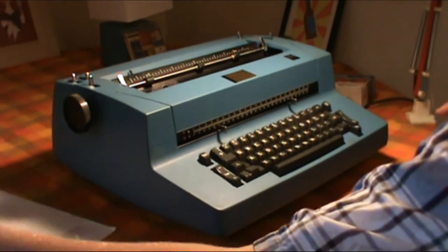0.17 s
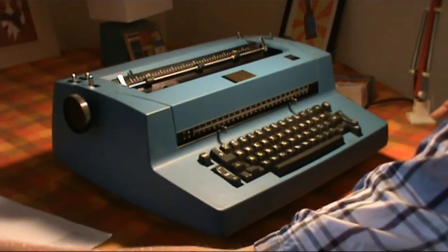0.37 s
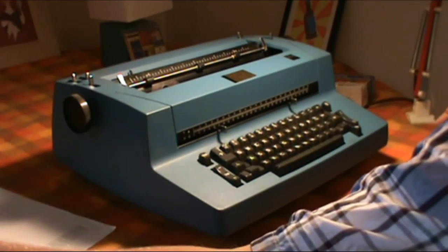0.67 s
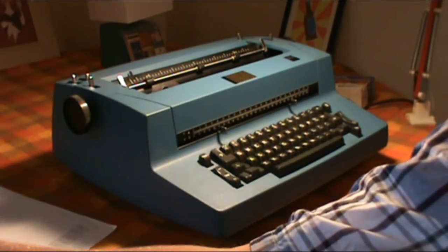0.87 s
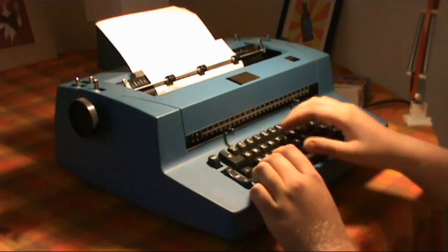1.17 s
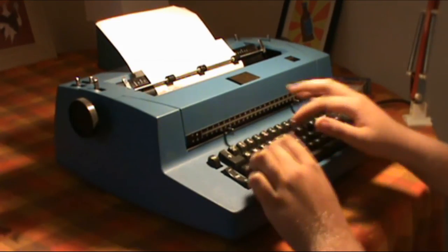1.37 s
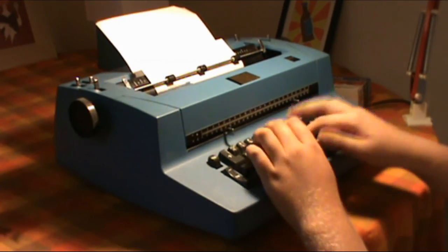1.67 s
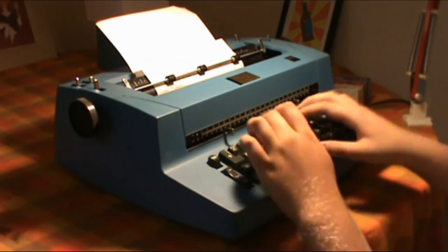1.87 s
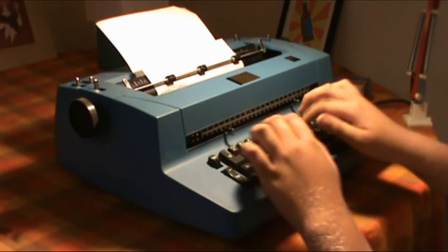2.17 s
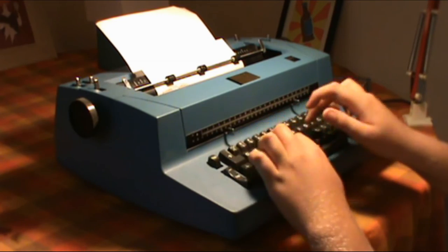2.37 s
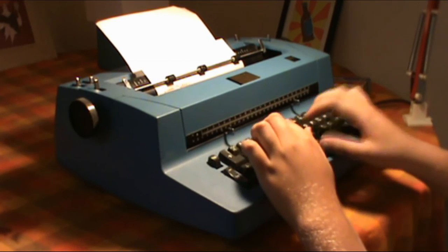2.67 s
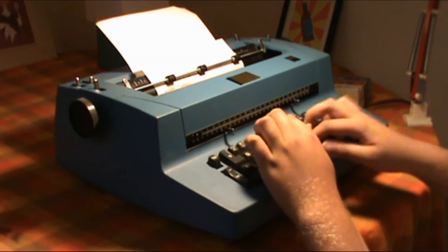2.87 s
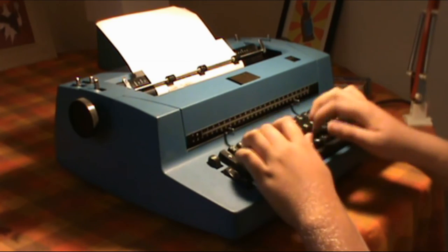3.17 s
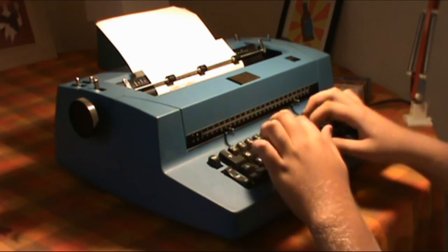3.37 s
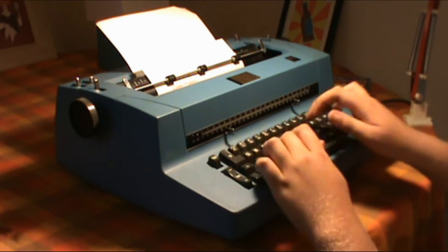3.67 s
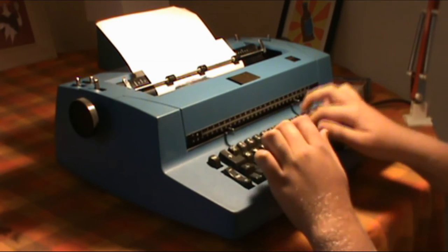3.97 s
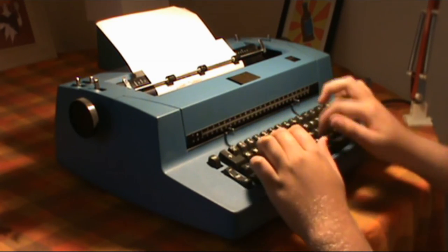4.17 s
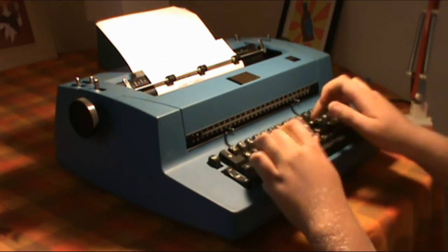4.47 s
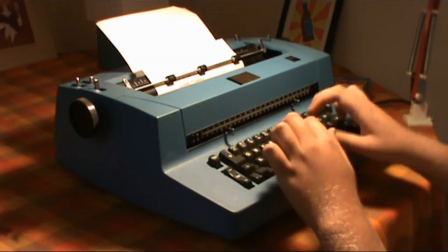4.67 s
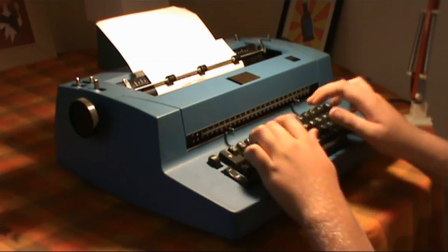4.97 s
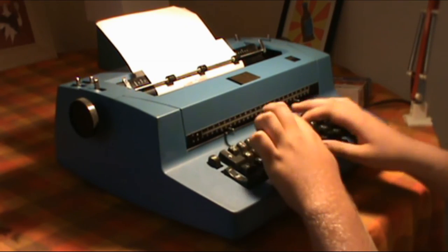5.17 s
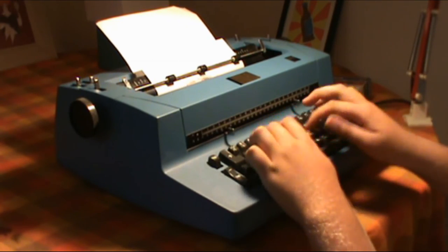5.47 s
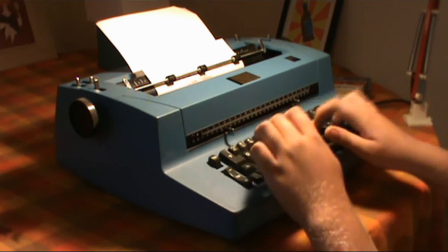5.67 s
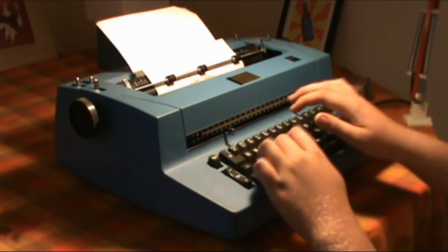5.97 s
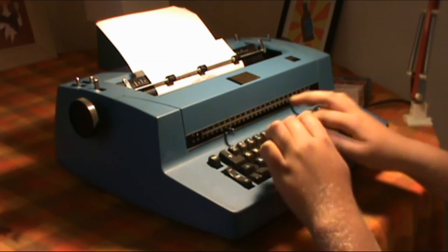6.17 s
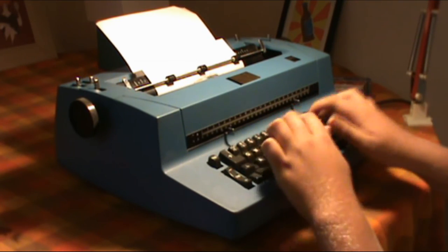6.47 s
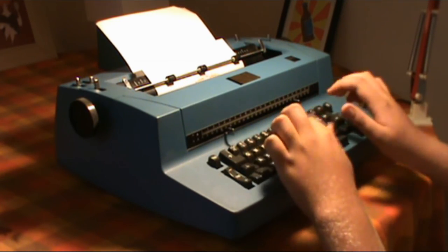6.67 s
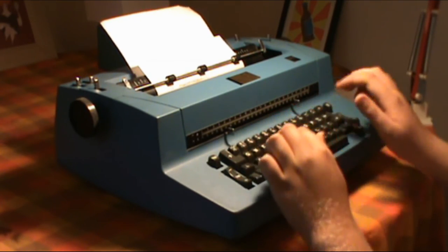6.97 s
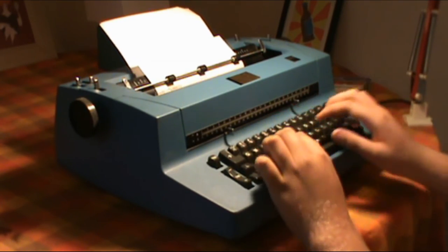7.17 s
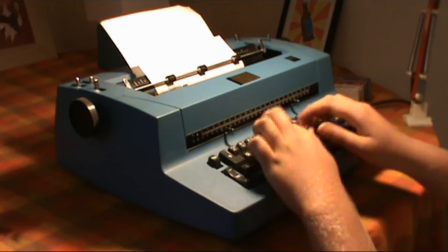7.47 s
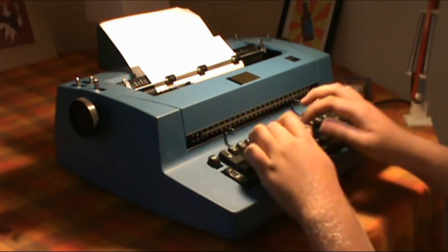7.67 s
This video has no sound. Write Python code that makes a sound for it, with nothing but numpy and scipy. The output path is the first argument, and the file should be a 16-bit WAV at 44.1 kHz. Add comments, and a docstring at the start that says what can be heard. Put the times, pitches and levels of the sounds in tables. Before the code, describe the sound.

Quiet motor hum and soft paper swish, then a sudden cut to busy electric typing: sharp key snaps, clacking print strikes, buzzing mechanical drive, late carriage return.

```python
"""An electric ball typewriter in a small room first idles, with a 120 Hz hum and a faint pulley tick, while
a sheet of paper is slid aside: sines, struck sines and filtered noise. Abruptly it is in full use: the drive
knocks about 70 times a second, keys snap, and bursts of impacts make each print cycle clack and clatter while
resonances boom as the case. Near the end the carriage runs back to the margin, and a few more print cycles
follow. Soft room air, filtered noise, lies under it all."""
import sys
import numpy as np
from scipy import signal
from scipy.fft import rfft, irfft
from scipy.io import wavfile
from scipy.ndimage import uniform_filter1d

SR = 44100
rng = np.random.default_rng(int(sys.argv[2]) if len(sys.argv) > 2 else 0)


def put_to_file(sound):
    """Save the sound as 16-bit audio at rate SR, in the file named by the first command-line argument."""
    columns = np.atleast_2d(sound).T  # one column per channel
    safe = np.clip(columns, -1, 1)
    whole_steps = np.round(safe * 32767)
    wavfile.write(sys.argv[1], SR, whole_steps.astype(np.int16))


N = 344862
T = np.arange(N) / SR  # time of every sample, s
IDLE_END = 1.074  # s
KNOCK_HZ = 70.5  # steady turns of the drive per second, one knock each

# Levels and strengths in the event tables are relative: each layer adds its own trim.
# Print cycles. Each row: nominal time in seconds, clatter level in dB, case boom level in dB.
PRINT_CYCLES = [(1.327, -20, -26.5), (1.439, -23.5, -29.5), (1.713, -18, -32), (1.822, -17.5, -30.5),
                (2.078, -16, -25.5), (2.17, -18, -31), (2.319, -18.5, -21), (2.438, -18.5, -38),
                (2.53, -19, -32), (2.942, -19, -24), (3.026, -20, -37), (3.136, -20.5, -24),
                (3.229, -18.5, -31), (3.3, -20, -25.5), (3.545, -18.5, -32), (3.624, -18.5, -43),
                (3.728, -19.5, -32), (3.823, -25, -34), (3.991, -19.5, -29), (4.127, -19.5, -26),
                (4.29, -20.5, -47.5), (4.454, -19, -30.5), (4.572, -18.5, -30), (4.715, -28, -52),
                (4.814, -18.5, -33), (4.895, -21.5, -27), (5.043, -18, -48), (5.14, -20, -28),
                (5.343, -18.5, -26), (5.413, -21, -38), (5.517, -17.5, -32.5), (5.595, -25.5, -63),
                (5.764, -20.5, -34), (5.854, -20.5, -28), (6.046, -17.5, -26), (6.154, -19, -40),
                (6.277, -27, -44), (6.407, -19, -29), (6.505, -18.5, -27), (6.619, -20.5, -24.5),
                (7.509, -18.5, -34), (7.618, -18.5, -30), (7.701, -19.5, -37)]
# Key and latch snaps. Each row: start in seconds, strength in dB, ring of the latch in Hz.
KEY_SNAPS = [(1.239, 2, 8000), (1.6286, 6.5, 8460), (1.9468, 7, 12300), (2.7908, 8.5, 12600),
             (2.8538, 4.5, 8380), (3.459, 9, 11500), (3.868, 9, 12600), (3.909, 5, 8530), (4.2148, 6, 5900),
             (4.4785, 5, 8140), (4.67, 6.5, 12000), (4.886, 2, 11000), (5.2506, 8.5, 10900),
             (5.3312, 1, 9400), (5.6347, 10, 11940), (5.765, 8, 9470), (5.967, 5, 9400), (6.3127, 8, 11900),
             (6.7667, 6, 8900), (6.773, 6.5, 6200), (7.423, 2, 8600)]
# Hard blows of the ball and its links. Each row: start in seconds, strength in dB.
HARD_BLOWS = [(1.287, 2), (1.682, 6.5), (1.904, 8.5), (3.4006, 7), (4.1114, 6.5), (4.779, 6.5), (5.309, 8),
              (5.682, 5.5), (5.7395, 4), (5.834, 9), (6.0239, 8.5), (6.2557, 7), (7.129, 7), (7.422, 8.5)]
# Heavy blows through the frame, the last as the carriage meets the margin. Each row: start in seconds, strength in dB.
FRAME_THUMPS = [(3.516, 3.5), (4.875, 8), (7.142, 5.5)]
# Loudness of the drive's knocking. Each row: time in seconds, level in dB.
KNOCK_LOUDNESS = [(1.1, -25.5), (1.6, -28), (2.12, -26), (2.86, -25), (2.95, -22.5), (3.58, -23),
                  (3.8, -27), (4.3, -23), (4.75, -27), (5.18, -23), (5.27, -30.5), (5.94, -51),
                  (6.07, -28.5), (6.68, -21), (6.88, -44), (6.93, -21.5), (7.09, -21), (7.22, -27),
                  (7.8, -22.5)]
# The belt-driven shaft gains and loses as the load changes. Each row: time in seconds, lead in turns.
SHAFT_LEAD = [(1.07, -.05), (1.5, .1), (1.63, .35), (2.1, .35), (2.55, .05), (2.9, .48), (3.25, .02),
              (3.65, -.15), (4.15, -.02), (4.55, -.23), (4.75, -.02), (5.2, -.22), (6, .02), (6.65, -.08),
              (6.9, .14), (7.17, -.26), (7.42, .3), (7.8, .08)]
# The drive takes up slack with one much harder knock. Each entry: time in seconds.
SLACK_JOLTS = [1.078, 1.093, 1.162, 1.177, 1.43, 1.596, 2.008, 2.832, 4.254, 4.637, 6.919, 7.262, 7.316]
# The carriage runs back to the margin. One row: start in seconds, end in seconds.
CARRIAGE_RUN = (6.945, 7.13)
# Print cycles that set the steel rail ringing. Each row: time in seconds, level in dB.
RAIL_STRIKES = [(3.235, -27), (4.285, -31), (4.81, -25), (5.395, -25), (6.1, -26), (7.57, -27.5)]
# Modes of the rail. Each entry: frequency in Hz.
RAIL_MODES = [3030, 3200, 3390]
# Turns on which the idling pulley catches on its higher note. Each entry: time in seconds.
PULLEY_CATCHES = [.104, .27, .337, .637]
# The sliding sheet. Each row: time in seconds, level in dB.
PAPER_SLIDE = [(0, -62), (.09, -57), (.18, -49.5), (.36, -66), (.55, -62), (.8, -68)]
# Relative spectra of knock, clatter, snap, paper and air. Each row: frequency in Hz, density in dB per Hz.
KNOCK_COLOUR = [(300, -8.5), (600, -15), (1250, -3), (1620, -1), (2000, 1), (2600, -11), (4400, -10.5),
                (5800, -13), (7500, -36), (9300, -11), (16000, -51)]
CLATTER_COLOUR = [(100, -1.5), (283, -3.5), (370, -7), (460, -4.5), (800, -8), (2000, -3.5), (3100, -6.5),
                  (5000, -6), (7300, -9.5), (9200, -7.5), (14400, -14.5), (16000, -21.5)]
SNAP_COLOUR = [(1500, -4), (3200, 1.5), (7200, -2.5), (9200, 4), (13000, -8), (16000, -13)]
PAPER_COLOUR = [(180, -30), (400, -6.5), (1700, -4), (5000, -4.5), (16000, -22)]
AIR_COLOUR = [(20, 1), (68, 6), (120, -1), (370, -5.5), (1500, -10), (16000, -14)]
# Resonances of case and table. Each row: frequency in Hz, width in Hz, relative level in dB.
CASE_MODES = [(77.4, 6.4, -20), (132.3, 10.6, -5.5), (203, 16, -13), (237.3, 9.8, -10), (280, 11.3, 4),
              (502.3, 15, -5.5), (537, 11, -5.5), (736, 18.5, -4)]
# Resonances of the metal frame. Each row: frequency in Hz, width in Hz, lift in dB.
FRAME_MODES = [(953, 40, 4.5), (1794, 28, 2.5), (1980, 40, 4), (3190, 290, 2.5), (5770, 190, 3)]
# Ring of machine and room. Each row: frequency in Hz, time to fall 60 dB in seconds.
RING_TIMES = [(200, 0.41), (1000, 0.37), (3000, 0.27), (8000, 0.17), (15000, 0.12)]
# Stereo width. Each row: frequency in Hz, side against mid in dB.
STEREO_WIDTH = [(60, -43), (250, -7.5), (500, -8), (2000, -8), (8000, -6.5), (12000, -7.5), (16000, -37)]


def strokes(mid_db=-3, bright_db=-6, body_db=-7.0, rise_s=0.028, fall_s=0.018, lead_s=0.0057, count=5):
    """Each print cycle is a burst of impacts: the ball tilts, turns, hits the platen and falls back."""
    rows, out = np.array(PRINT_CYCLES), np.zeros((2, N))
    for k in range(count):  # deal the cycles out to different links, each with its own ring
        s, db, _ = rows[k::count].T
        # root 2 turns the rise and fall of the amplitude into those of the power
        power = swells(s - lead_s, db, rise_s / np.sqrt(2), fall_s / np.sqrt(2))
        impacts = np.sqrt(power) * grains(per_s=380, spread_db=2.0)
        out += amp(mid_db) * strike(impacts, CLATTER_COLOUR, wet_db=5, lo_hz=1630, hi_hz=6200)
        out += amp(bright_db) * strike(impacts, CLATTER_COLOUR, wet_db=3.5, lo_hz=8300)
        out += amp(body_db) * strike(impacts, CLATTER_COLOUR, wet_db=-1, lo_hz=250, hi_hz=1600)
    return out


def clacks(settle_s=0.0043, thump_s=0.0094):
    """The ball hits the platen or a link its stop: a sudden hard clack, or a duller thump, through the frame."""
    out = np.zeros((2, N))
    for s, db in HARD_BLOWS:
        add(out, s, amp(db) * strike(blow(settle_s), CLATTER_COLOUR, wet_db=2, lo_hz=800, hi_hz=6700))
    for s, db in FRAME_THUMPS:
        add(out, s, amp(db) * strike(blow(thump_s), CLATTER_COLOUR, wet_db=1, lo_hz=480, hi_hz=1520))
    return out


def keys(snap_s=0.0085, lift_db=9, lift_width_hz=2800, ring_db=-8, ring_cycles=1100, spread=0.021, count=6):
    """A key trips its latch with a bright snap, and the latch rings on a few close modes of its own."""
    out, hz = np.zeros((2, N)), np.geomspace(200, 16000, num=120)
    for s, db, ring_hz in KEY_SNAPS:
        push = blow(snap_s)
        lift = lift_db / (1 + (2 * (hz - ring_hz) / lift_width_hz) ** 2)
        colour = read(SNAP_COLOUR, hz) + lift
        snap = strike(push, np.transpose([hz, colour]), wet_db=0, lo_hz=180)
        t = T[:len(push)]
        modes_hz = ring_hz * (1 + spread * rng.standard_normal(count))
        ring = sum(np.sin(2 * np.pi * f * t) for f in modes_hz)
        ring = ring * amp(-60 * t * ring_hz / ring_cycles)  # falls 60 dB in ring_cycles cycles
        snap[0] += amp(ring_db) * ring / np.linalg.norm(ring)
        add(out, s, amp(db) * snap)
    return out


def drive(level_db=-6, ring_db=-5, knock_hz=2010, knock_s=0.00054, chatter_db=-3.5, jolt_db=3, count=3):
    """Knocks swing a stiff bracket, even under load and ragged when slack; the frame rings, loose parts chatter."""
    times = knock_times()
    size, late, seat = rng.standard_normal((len(times), 3)).T
    slack = np.clip((-19 - np.interp(times, *np.transpose(KNOCK_LOUDNESS))) / 7, .2, 1)  # quieter is slacker
    times = times + .0005 * slack * late
    size = amp(4 * slack * np.minimum(size, .9))
    level = knock_level()
    scale = level / np.sqrt(np.sum(size ** 2) / N)
    seat, t = np.argsort(seat) % count, T[:SR // 100]
    chatter = level * grains(per_s=500, spread_db=2)
    out = amp(chatter_db) * strike(chatter, KNOCK_COLOUR, wet_db=-21.5, lo_hz=397)
    for k in range(count):  # the bracket seats in different ways, each with its own pitch and ring
        knocks = scale * clicks(times, size * (seat == k))
        jolts = amp(jolt_db) * clicks(SLACK_JOLTS[k::count], 0.96)
        hz = knock_hz * 1.02 ** (k - count / 2 + .5)
        swing = t * np.exp(-t / knock_s) * np.sin(2 * np.pi * hz * t)
        swing /= np.linalg.norm(swing)
        out[0] += signal.oaconvolve(amp(level_db) * knocks + jolts, swing)[:N]
        out += strike(amp(ring_db) * knocks + jolts / 2, KNOCK_COLOUR, wet_db=6, lo_hz=380)
    return out


def rattle(level_db=-5.5, count=2):
    """Springs and links shake all the while the machine is in use: scattered impacts through the frame."""
    level = amp(level_db) * rattle_level() / np.sqrt(count)
    out = np.zeros((2, N))
    for _ in range(count):
        impacts = level * grains(per_s=330, spread_db=4.0)
        out += strike(impacts, CLATTER_COLOUR, wet_db=4.5, lo_hz=232)
    return out


def rail(rise_s=.018, fall_s=0.028, return_db=-33, width_hz=190):
    """The steel rail rings under some print cycles and rattles while the carriage runs back along it."""
    power = swells(*np.transpose(RAIL_STRIKES), rise_s, fall_s) + carriage(return_db)
    impacts = np.sqrt(power) * grains(per_s=500, spread_db=6.5)
    ring = evened(sum(resonate(impacts, hz, width_hz) for hz in RAIL_MODES)) * impacts.std()
    return np.array([ring, np.zeros(N)])


def case(level_db=-6.0, shake=1.87, steady_db=-34, side_db=-12, thud_db=-22):
    """Knocks and random jolts keep the hollow case droning; its lowest modes follow the load only partly."""
    push = evened(clicks(knock_times(), 1))
    load_db = case_load() + level_db
    low = amp(steady_db + 0.51 * (load_db - steady_db))
    out = low * amp(thud_db) * noise([(20, -6), (55, 3), (100, 5), (200, -28), (500, -43)])
    for hz, width, db in CASE_MODES:
        mode = resonate(push - push.mean() + shake * rng.standard_normal(N), hz, width)
        mode /= np.sqrt(abs(uniform_filter1d(mode ** 2, size=6000)) + 1e-4)  # hold the drone steady
        side = amp(side_db) * resonate(rng.standard_normal(N), hz, width) + 0.067 * mode
        level = amp(load_db) if hz > 215 else low
        out += amp(db) * np.array([mode, side]) * level
    return out * (T > IDLE_END)


def idle(tick_db=-66, tick_hz=1902, catch_hz=2400, tick_t60=0.092,
         tap_db=-70, hum_db=-67, hum_hz=120, murmur_db=-69):
    """The motor hums and murmurs; its pulley ticks once a turn and now and then catches on a higher note."""
    times = np.arange(.0035, IDLE_END, 1 / 29.99)  # about 30 turns a second
    size = amp(2 * rng.standard_normal(len(times)))
    catch_turns = np.searchsorted(times, np.array(PULLEY_CATCHES) - .01)
    catches = np.isin(np.arange(len(times)), catch_turns)
    t, ring = T[:SR // 8], 0
    for hz, chosen in (tick_hz, ~catches), (catch_hz, 0.83 * catches):
        note = np.sin(2 * np.pi * hz * t) * amp(-60 * t / tick_t60)
        ring += signal.oaconvolve(clicks(times, size * chosen), note)[:N]
    tap_colour = [(1000, -6), (2500, -4), (3200, -17), (3850, -3), (5000, -21)]
    taps = strike(clicks(times, size), tap_colour, wet_db=-18)
    share = np.sqrt(IDLE_END * SR / N)  # keeps tick and tap levels true over the idle alone
    body = share * amp(tick_db) * evened(ring)
    body += amp(hum_db) * evened(np.sin(2 * np.pi * hum_hz * T))
    body += amp(murmur_db) * resonate(rng.standard_normal(N), hz=148, width=90)
    return (body * [[1], [.15]] + share * amp(tap_db) * evened(taps)) * (T < IDLE_END)


def paper():
    """A sheet slides over the table: friction as coloured noise that swells and fades with the motion."""
    return noise(PAPER_COLOUR) * amp(follow(PAPER_SLIDE)) * (T < IDLE_END)


def air(level_db=-63):
    """The quiet of the room: steady, low-weighted noise."""
    return amp(level_db) * noise(AIR_COLOUR)


def knock_times():
    """One knock for every turn of the drive, as its shaft gains and loses."""
    turns = KNOCK_HZ * T + follow(SHAFT_LEAD)
    return T[np.flatnonzero(np.diff(np.floor(turns)))]


def knock_level():
    """How hard the drive knocks, as a gain."""
    return amp(follow(KNOCK_LOUDNESS)) * (T > IDLE_END)


def rattle_level(loose_db=1.5, stroke_db=0.7, rise_s=0.069, fall_s=0.058,
                 key_db=-23, key_rise_s=0.00071, key_fall_s=0.095, return_db=-37):
    """The links shake with the knocks, around each print cycle, after each key and in the carriage return."""
    s, db, _ = np.transpose(PRINT_CYCLES)
    power = amp(follow(KNOCK_LOUDNESS) + loose_db) ** 2
    power += swells(s, db + stroke_db, rise_s, fall_s)
    power += swells(np.transpose(KEY_SNAPS)[0], key_db, key_rise_s, key_fall_s)
    power += carriage(return_db)
    return np.sqrt(power) * (T > IDLE_END)


def case_load(knock_db=-15, boom_db=-2.5, lag_s=0.0053, rise_s=0.025, fall_s=0.057, return_db=-29):
    """Shaking of the case in dB: lightly by the knocks, heavily by print cycles and the carriage return."""
    s, _, db = np.transpose(PRINT_CYCLES)
    power = amp(follow(KNOCK_LOUDNESS) + knock_db) ** 2
    power += swells(s + lag_s, db + boom_db, rise_s, fall_s)
    power += carriage(return_db)
    return 10 * np.log10(power)


def carriage(db, start_s=0.02, stop_s=0.021):
    """Power of the carriage return: the clutch takes hold, pulls evenly and lets go."""
    start, end = CARRIAGE_RUN
    return swells([start], db, start_s, stop_s, hold_s=end - start)


def swells(times, db, rise_s, fall_s, hold_s=0):
    """Power of a motion that builds up to each time, may hold, and dies away."""
    power = np.zeros(N)
    for s, level in zip(times, amp(db) * np.ones(len(times))):
        near = slice(max(int((s - 4 * rise_s) * SR), 0), int((s + hold_s + 4 * fall_s) * SR))
        t = T[near] - s
        rise = (np.minimum(t, 0) / rise_s) ** 2
        fall = (np.maximum(t - hold_s, 0) / fall_s) ** 2
        power[near] += level ** 2 * np.exp(-rise - fall)
    return power


def strike(impacts, spectrum, wet_db, lo_hz=20, hi_hz=20000, size=16384):
    """Impacts on one part: a direct click, then the dense ring of frame and room, as mid and side."""
    hz, t, z = signal.stft(rng.standard_normal((2, size)), SR, nperseg=256)
    decay = amp(-60 * t / read(RING_TIMES, hz)[:, None])
    tail = signal.istft(z * decay, SR, nperseg=256)[1][:, :size]
    tail /= np.linalg.norm(tail, axis=1, keepdims=True)
    tail[0] *= amp(wet_db)
    tail[0] += contact(size)
    tail[0] /= np.linalg.norm(tail[0])
    hz = abs(np.fft.fftfreq(size, 1 / SR))
    frame_db = sum(db / (1 + (2 * (hz - f) / w) ** 2) for f, w, db in FRAME_MODES)
    gain = amp(read(spectrum, hz) + frame_db)
    gain = gain / np.sqrt((1 + (lo_hz / (hz + 1)) ** 6) * (1 + (hz / hi_hz) ** 6))
    # minimum phase: the colouring adds nothing before the blow
    colour = np.exp(np.conj(signal.hilbert(np.log(evened(gain) + 1e-5))))
    z = np.fft.fft(tail) * colour
    z[1] *= amp(read(STEREO_WIDTH, hz))
    return signal.oaconvolve(impacts[None], np.fft.ifft(z).real, axes=1)[:, :len(impacts)]


def contact(size, spread_s=0.0005985, count=40):
    """A click of even colour, each pitch delayed a little differently through the metal; energy 1."""
    delays = spread_s * (.5 + rng.exponential(1, count))
    delay = np.interp(np.linspace(0, count - 1, size // 2 + 1), np.arange(count), delays)
    return irfft(np.exp(-2j * np.pi * np.cumsum(delay) * SR / size))


def blow(fall_s, per_s=1800, size=8192):
    """The push of a part that lands at once and bounces to rest, energy 1."""
    bounces = rng.choice([-1., 1.], size) * (rng.random(size) < per_s / SR)
    push = bounces * np.exp(-T[:size] / fall_s)
    push[0] = 2
    return push / np.linalg.norm(push)


def grains(per_s, spread_db):
    """Random impacts of uneven size, rms 1."""
    size = amp(spread_db * np.minimum(rng.exponential(1, N), 4)) * rng.choice([-1, 1], N)
    return evened(size * (rng.random(N) < per_s / SR))


def clicks(times, sizes):
    """A track of single impulses."""
    at = np.clip(np.round(np.asarray(times) * SR).astype(int), 0, N)
    return np.bincount(at, sizes * np.ones(len(at)), N + 1)[:N]


def resonate(x, hz, width):
    """A resonance with steep skirts, rms 1."""
    r = np.exp(-np.pi * width * np.sqrt(2) / SR) * np.exp(2j * np.pi * hz / SR)
    return evened(signal.lfilter([1], [1, -2 * r, r * r], x).real)


def noise(spectrum):
    """Coloured noise as mid and side, the mid at rms 1."""
    hz = np.fft.rfftfreq(N, 1 / SR)
    z = rfft(rng.standard_normal((2, N))) * amp(read(spectrum, hz))
    z[1] *= amp(read(STEREO_WIDTH, hz))
    x = irfft(z, N)
    return x / x[0].std()


def amp(db):
    """Decibels to gain."""
    return 10 ** (np.asarray(db) / 20)


def evened(x):
    """Scales to rms 1."""
    return x / np.sqrt(np.mean(x ** 2) + 1e-20)


def read(points, hz):
    """Reads a curve over frequency on a log axis."""
    f, value = np.transpose(points)
    return np.interp(np.log(hz + 1), np.log(f + 1), value)


def follow(rows):
    """A curve over time, read at every sample."""
    return np.interp(T, *np.transpose(rows))


def add(mix, s, sound):
    """Mixes a sound in at a time in seconds."""
    part = mix[:, round(s * SR):][:, :sound.shape[1]]
    part += sound[:, :part.shape[1]]


def scene():
    """All sources as mid and side, turned to left and right."""
    working = strokes() + clacks() + keys() + drive() + rattle() + rail() + case()
    mid, side = working + idle() + paper() + air()
    return np.array([mid + side, mid - side])


def record(dry, ceiling=0.95, edge_hz=15950):
    """Soft saturation rounds off the highest peaks, then a steep low-pass limits the band."""
    soft = ceiling * np.tanh(dry / ceiling)
    low_pass = signal.firwin(511, edge_hz, window=("kaiser", 9), fs=SR)
    return signal.oaconvolve(soft, low_pass[None], "same", axes=1)


dry = scene()
out = record(dry)
put_to_file(out)
```